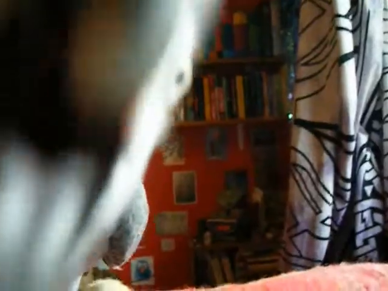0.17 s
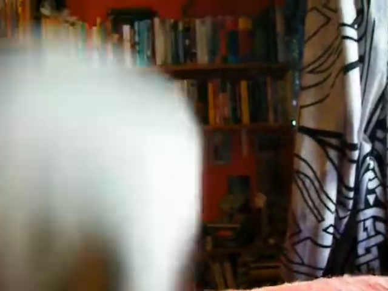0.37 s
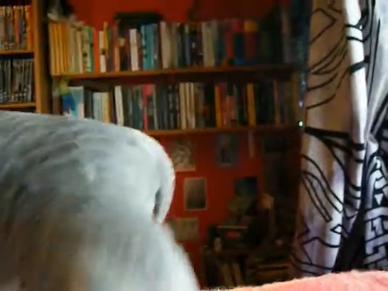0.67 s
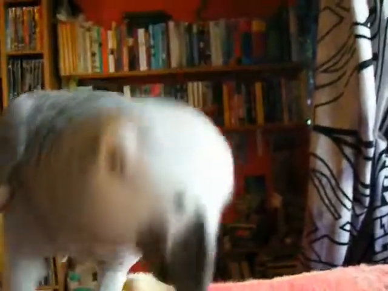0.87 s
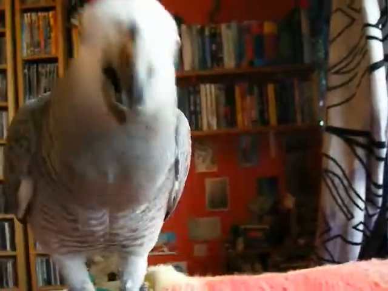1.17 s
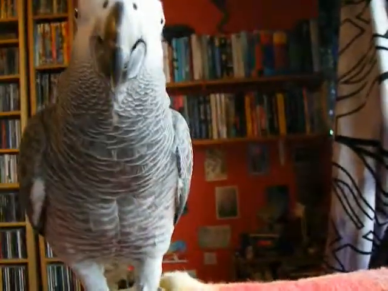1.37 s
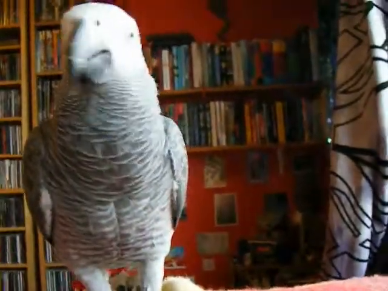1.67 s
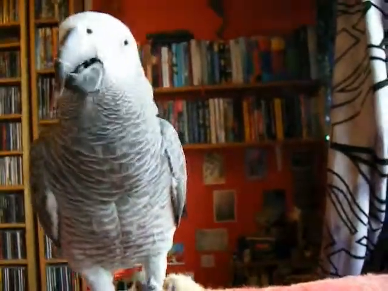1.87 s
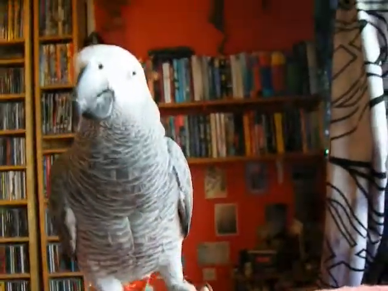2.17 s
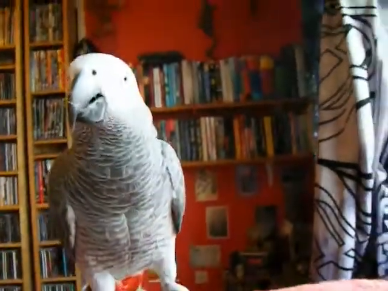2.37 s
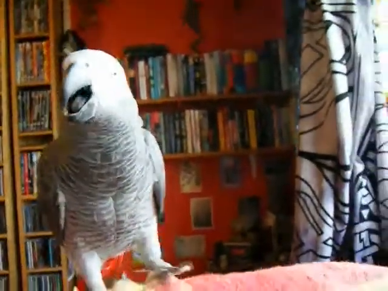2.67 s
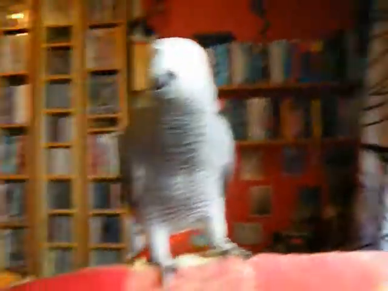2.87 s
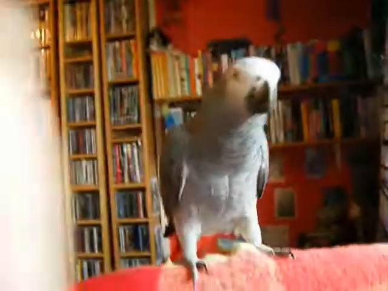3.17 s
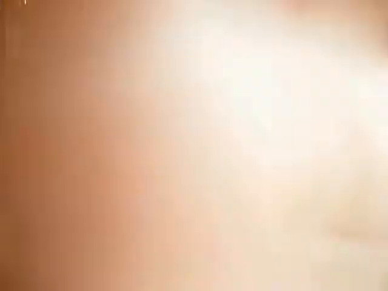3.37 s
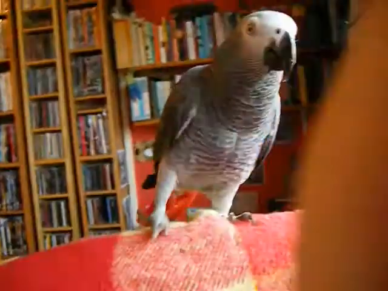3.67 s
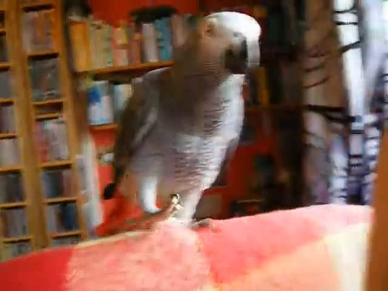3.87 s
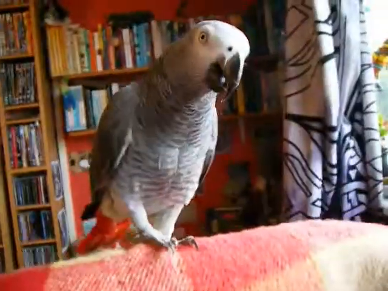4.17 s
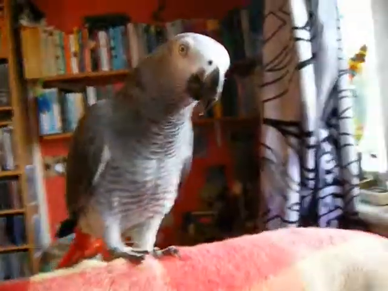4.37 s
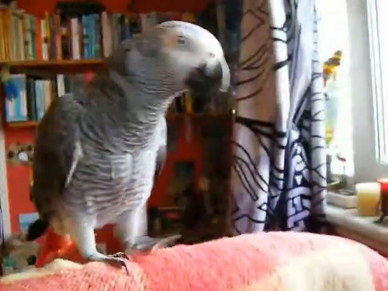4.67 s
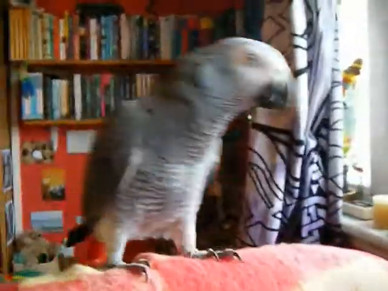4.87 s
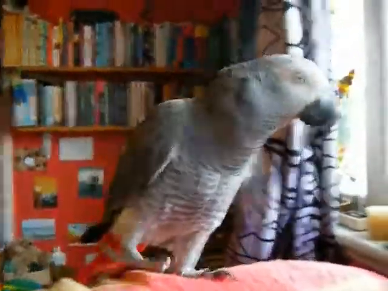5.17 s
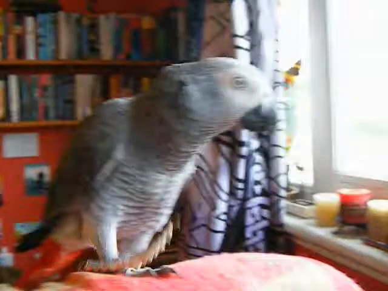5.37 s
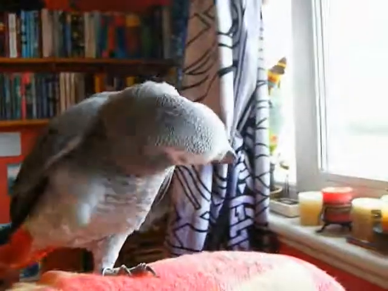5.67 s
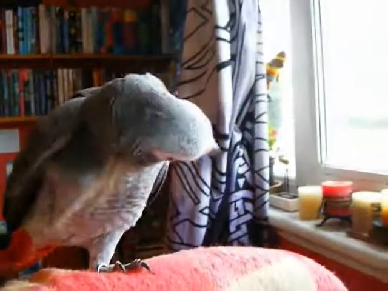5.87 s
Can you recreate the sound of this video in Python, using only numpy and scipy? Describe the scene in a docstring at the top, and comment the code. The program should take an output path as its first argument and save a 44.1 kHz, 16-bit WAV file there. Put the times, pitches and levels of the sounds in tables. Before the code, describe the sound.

Fingers brush and tick on a small camera over room hum, with a sharp beak-like click and a hard knock, all narrow-sounding.

```python
"""Room air, mains hum and a thin fan whine in a living room, heard through a small hand-held camera.
Feathers and fingers brush its plastic case in swarms of tiny slips; light touches ring it.
A sharp, loud click, perhaps a grey parrot's beak, rises in pitch and chatters away.
The grip creaks; fingers tick and knock on the case as the camera turns.
The sound is narrow, like a telephone's; the sharp click and the last knock overload it."""
import sys
import numpy as np
from scipy import signal
from scipy.fft import rfft, irfft
from scipy.io import wavfile

SR = 44100
rng = np.random.default_rng(int(sys.argv[2]) if len(sys.argv) > 2 else 0)


def store_pcm(level_fs):
    """Save levels as 16-bit WAV."""
    pcm = np.round(np.clip(level_fs, -1, 1) * 32767).astype(np.int16)
    wavfile.write(sys.argv[1], SR, np.atleast_2d(pcm).T)


N = 265834
TIME_S = np.arange(N) / SR
HIT_TIME_S = TIME_S[:SR // 5]

# Room air facing the shelves, and facing the window. Each row: frequency in Hz, relative density in dB.
SHELVES_SPECTRUM = [(40, -15.5), (100, -13), (200, -14), (310, 1), (450, -4.5), (750, -4), (1050, -4),
                    (1400, -8.5), (1900, -13.5), (2400, -10), (3000, -12.5), (3600, -18)]
WINDOW_SPECTRUM = [(40, -21), (100, -12), (200, -8), (330, -4), (500, -0.5), (720, 2.5), (1000, -3.5),
                   (1500, -5), (2050, -3.5), (2350, -10), (3000, -9.5), (3600, -13.5)]
# Air as the camera turns. Each row: time in seconds, level in dB, window share of the power from 0 to 1.
AIR_TURN = [(0, -40.5, 0.16), (3.4, -40, 0.47), (4.2, -36, 0.39), (5.0, -40, .5), (6.03, -40, .85)]
# Hum overtones. Each row: multiple of the hum frequency, relative level in dB.
HUM_OVERTONES = [(3, 0), (5, -6)]
# Fan tones. Each row: frequency in Hz, relative level in dB.
WHINE_TONES = [(167, -20), (778.2, -1), (1039, -14), (2336, -17)]
# Level curves of the hum, its overtones and the whine. Each row: time in seconds, level in dB.
HUM_LEVELS = [(0.15, -70), (2.68, -52.5), (4.46, -49), (5.9, -52.5)]
OVERTONE_LEVELS = [(0, -66), (3.0, -65.5), (3.7, -50.5), (5.1, -49), (6.03, -54.5)]
WHINE_LEVELS = [(0, -46.5), (1.5, -42.5), (2.5, -45.5), (4.2, -44.5), (4.75, -42.5), (6.03, -46.5)]
# Brush strokes. Each row: middle in seconds, half length in seconds, level in dB, band centre in Hz.
BRUSH_STROKES = [ (0.474, 0.035, -34.5, 700), (1.306, 0.019, -41.5, 443), (2.164, 0.026, -39, 307),
                 (2.588, 0.0095, -34.5, 1100), (2.671, 0.045, -39.5, 1070), (2.773, 0.079, -33, 1260),
                 (2.953, 0.057, -34.5, 1600), (3.047, 0.03, -38.5, 1820), (3.177, 0.062, -38.5, 1950),
                 (3.328, 0.01, -38.5, 2080), (3.724, 0.032, -34, 1640), (3.88, 0.14, -41, 1900),
                 (4.003, 0.025, -38.5, 2000), (4.342, 0.026, -31, 1850), (4.437, 0.025, -34.5, 2600),
                 (4.545, 0.0095, -37, 2300), (5.795, 0.012, -40, 2370), ]
# Light touches. Each row: start in seconds, spot level in dB, spot pitch in Hz, spot T60 in seconds,
# case level in dB.
LIGHT_TOUCHES = [ (1.2984, -17, 620, 0.0041, -25.5), (1.3650, -12, 3390, 0.011, -50),
                 (1.3784, -25.5, 2050, .012, -50), (1.916, -19, 3040, 0.0057, -18),
                 (1.9619, -17, 2400, .01, -32), (2.1771, -25.5, 372, 0.0081, -30),
                 (2.5588, -23.5, 1450, .008, -25), (2.5758, -7.5, 1000, 0.0059, -8.5),
                 (2.6540, -15, 1630, 0.0061, -15.5), (2.7798, -26, 3200, 0.007, -18.5),
                 (2.8523, -12.5, 940, .003, -23.5), (2.9067, -13, 2420, 0.0058, -42),
                 (2.9678, -13, 760, 0.013, -30), (4.034, -20, 920, 0.012, -36),
                 (4.0483, -24.5, 3350, .006, -23), (4.0562, -21, 890, 0.017, -26),
                 (4.1056, -22, 900, .016, -28), (4.1703, -18.5, 700, .0075, -34),
                 (4.1810, -20.5, 882, 0.016, -37.5), (4.2277, -13.5, 646, 0.0047, -23),
                 (4.3087, -11, 2310, 0.0055, -14), (4.4009, -21.5, 1680, 0.0053, -28),
                 (4.6680, -27.5, 3100, .007, -31), (4.7114, -17, 780, 0.0041, -32.5),
                 (4.7890, -24, 2500, .005, -29.5), (4.8225, -28, 2500, 0.007, -24.5),
                 (5.3132, -13, 2810, 0.0048, -15.5), (5.3134, -15, 1950, 0.013, -37), ]
# Modes of the case and of one panel. Each row: frequency in Hz, relative level in dB, T60 in seconds.
CASE_MODES = [(366, -8.5, 0.017), (895, 6, 0.0035), (1012, -26, 0.0054), (1620, -17, 0.0017),
              (2063, -4.5, 0.0095), (2775, -13, 0.011), (3320, -14, 0.013)]
PANEL_MODES = [(903, -5.5, .012), (1079, -9, 0.043), (1215, -7, 0.063), (3278, -8, .014)]
# Finger knocks on the panel. Each row: start in seconds, level in dB.
PANEL_KNOCKS = [(4.1599, -18), (4.5980, -0.5)]


def from_db(db):
    """Decibels to gain."""
    return 10 ** (np.asarray(db) / 20)


def unit_rms(x):
    """Scale to rms 1."""
    return x / np.sqrt(np.mean(x ** 2) + 1e-20)


def curves(rows):
    """Interpolate timed rows to one per-sample curve per value column."""
    times_s, *columns = np.transpose(rows)
    return [np.interp(TIME_S, times_s, column) for column in columns]


def add(out, start_s, sound):
    """Mix a sound in at start_s."""
    at = max(round(start_s * SR), 0)
    out[at:at + len(sound)] += sound[:N - at]


def coloured_noise(spectrum):
    """Steady noise with the given spectrum, rms 1."""
    hz, db = np.transpose(spectrum)
    bins_hz = np.maximum(np.arange(N // 2 + 1) * SR / N, 1)
    gains = from_db(np.interp(np.log(bins_hz), np.log(hz), db))
    return unit_rms(irfft(rfft(rng.standard_normal(N)) * gains, N))


def room_air():
    """Air noise changes colour as the camera turns from shelves to window."""
    level_db, share = curves(AIR_TURN)
    shelves = np.sqrt(1 - share) * coloured_noise(SHELVES_SPECTRUM)
    window = np.sqrt(share) * coloured_noise(WINDOW_SPECTRUM)
    return from_db(level_db) * (shelves + window)


def drift(knots_per_s):
    """Slow random curve through unit normal knots."""
    knots = rng.standard_normal(N // 100)
    return np.interp(TIME_S * knots_per_s, np.arange(len(knots)), knots)


def tone(hz, waver_hz, flutter_db=1.2):
    """Slightly unsteady sine, rms about 1."""
    phase = 2 * np.pi * np.cumsum(hz + waver_hz * drift(4.5)) / SR
    return np.sqrt(2) * np.sin(phase) * from_db(flutter_db * drift(7))


def mains_hum(hz=120.15):
    """Hum and overtones swell and fade as the camera moves through their standing waves."""
    hum_db, = curves(HUM_LEVELS)
    overtones_db, = curves(OVERTONE_LEVELS)
    hum = tone(hz, waver_hz=0.1, flutter_db=0.3)
    overtones = sum(from_db(db) * tone(k * hz, waver_hz=0.6) for k, db in HUM_OVERTONES)
    return from_db(hum_db) * hum + from_db(overtones_db) * overtones


def fan_whine():
    """Thin wavering tones, as of a small fan."""
    level_db, = curves(WHINE_LEVELS)
    return from_db(level_db) * sum(from_db(db) * tone(hz, waver_hz=1.0) for hz, db in WHINE_TONES)


def brushing(slips_per_s=1500, size_db=3.0, hiss_db=-4, port_hz=2080, port_width_hz=400, port_gain=0.62):
    """Friction: tiny slips on a smooth hiss, coloured by the hollow of the microphone port."""
    sizes = from_db(size_db * np.minimum(rng.exponential(1, N), 4))
    signs = rng.choice([-1, 1], N)
    slips = unit_rms(sizes * signs * (rng.random(N) < slips_per_s / SR))
    friction = slips + from_db(hiss_db) * rng.standard_normal(N)
    port = signal.iirpeak(port_hz, port_hz / port_width_hz, fs=SR)
    friction += port_gain * signal.lfilter(*port, friction)
    out = np.zeros(N)
    for middle_s, half_s, db, hz in BRUSH_STROKES:
        width_octaves = max(1.46 + 0.14 * (db + 34.5), 0.5)  # firmer stroke, wider band
        edge_ratio = 2 ** (width_octaves / 2)
        edges_hz = np.clip([hz / edge_ratio, hz * edge_ratio], 20, SR / 4)
        band = signal.sosfilt(signal.butter(2, edges_hz, "band", fs=SR, output="sos"), friction)
        envelope = np.exp(-0.75 * ((TIME_S - middle_s) / half_s) ** 2)
        out += from_db(db) * envelope * unit_rms(band)
    return out


def decay(t60_s, hold_s=0):
    """Envelope: holds, then falls 60 dB per t60_s."""
    return from_db(-60 * np.maximum(HIT_TIME_S - hold_s, 0) / t60_s)


def mode(hz, t60_s):
    """Struck mode: a decaying sine."""
    return np.sin(2 * np.pi * hz * HIT_TIME_S) * decay(t60_s)


def ping(db, hz, t60_s=0.008, swell_cycles=0.15):
    """One short ring that swells within its first cycle."""
    sound = mode(hz, t60_s) * (1 - np.exp(-HIT_TIME_S * hz / swell_cycles))
    return from_db(db) * sound / np.abs(sound).max()


def clack(db, spread_db=1.5):
    """A plastic-sounding clack: short modes with new strengths each time."""
    offsets_db = spread_db * rng.standard_normal(len(CASE_MODES))
    return sum((-1) ** k * from_db(db + mode_db + offsets_db[k]) * mode(hz, t60_s)
               for k, (hz, mode_db, t60_s) in enumerate(CASE_MODES))


def with_tail(click, tail_db=-14, t60_s=0.092, build_s=0.003):
    """A click plus its diffuse after-ring."""
    envelope = decay(t60_s) * (1 - np.exp(-HIT_TIME_S / build_s))
    scatter = rng.standard_normal(len(click)) * envelope
    tail = signal.fftconvolve(click, scatter / np.linalg.norm(scatter))[:len(click)]
    return click + from_db(tail_db) * tail


def light_touches():
    """Each light touch rings one spot and the whole case."""
    out = np.zeros(N)
    for start_s, spot_db, hz, t60_s, case_db in LIGHT_TOUCHES:
        add(out, start_s, with_tail(ping(spot_db, hz, t60_s) + clack(case_db)))
    return out


def sharp_click(start_s=1.9635, click_db=-0.5, clack_offset_db=-18.5, tail_db=-11,
                from_hz=1974, to_hz=3412, rise_s=0.0028, swell_s=0.00076,
                chatter_db=-7.5, loss_db=3, gap_s=0.0024):
    """A loud click, perhaps the parrot's beak, rises quickly in pitch, then chatters in weaker clicks."""
    out = np.zeros(N)
    pitch_hz = np.interp(HIT_TIME_S, [rise_s / 2, rise_s], [from_hz, to_hz])
    envelope = (1 - np.exp(-HIT_TIME_S / swell_s)) * decay(t60_s=0.0087, hold_s=rise_s)
    chirp = from_db(click_db) * envelope * np.sin(2 * np.pi * np.cumsum(pitch_hz) / SR)
    add(out, start_s, with_tail(chirp + clack(click_db + clack_offset_db), tail_db))
    for k, hz in enumerate((3030, 1960, 2900, 3030)):
        db = chatter_db - k * loss_db
        chatter = ping(db, hz) + clack(db + clack_offset_db)
        add(out, start_s + rise_s + (k + 1) * gap_s, with_tail(chatter, tail_db))
    return out


def grip_slip(start_s=2.8594, gap_s=0.003, first_db=-14, rise_db=1.77, case_offset_db=-3.5):
    """A finger sticks and slips in a short creak, each catch harder than the last."""
    out = np.zeros(N)
    for k, spot_hz in enumerate((3290, 1500, 800, 3290, 1500)):
        db = first_db + k * rise_db
        catch = ping(db, spot_hz) + clack(db + case_offset_db)
        add(out, start_s + k * gap_s, with_tail(catch, tail_db=-13))
    return out


def finger_fidgets(start_s=4.0, span_s=0.6, count=7, centre_hz=706, spread_octaves=0.8):
    """Fingers turning the camera tick faintly at random moments and pitches."""
    out = np.zeros(N)
    for when, pitch in rng.random((count, 2)):
        hz = centre_hz * 2 ** (spread_octaves * (2 * pitch - 1))
        tick = ping(db=-30, hz=hz) + clack(db=-30.5)
        add(out, start_s + when * span_s, with_tail(tick))
    return out


def finger_knocks(thud_offset_db=-13, case_offset_db=-10, rebound_s=0.0083, rebound_db=-20):
    """A finger thuds on a panel, rings it with the case and rebounds once."""
    out = np.zeros(N)
    for start_s, db in PANEL_KNOCKS:
        panel = sum((-1) ** k * ping(db + mode_db, hz, t60_s)
                    for k, (hz, mode_db, t60_s) in enumerate(PANEL_MODES))
        thud = ping(db + thud_offset_db, hz=370, t60_s=0.021)
        knock = clack(db + case_offset_db) - panel - thud
        add(out, start_s, with_tail(knock, tail_db=-10))
        add(out, start_s + rebound_s, from_db(rebound_db) * knock)
    return out


def scene(low_cut_hz=170):
    """All sources at one microphone; the clicks and knocks have little bass."""
    room = room_air() + mains_hum() + fan_whine()
    strokes = brushing()
    clicks = light_touches() + sharp_click() + finger_knocks() + grip_slip() + finger_fidgets()
    low_cut = signal.butter(1, low_cut_hz, "high", fs=SR, output="sos")
    return (room + strokes + signal.sosfilt(low_cut, clicks))[None]


def record(dry, band_hz=3688, clip_level=0.71, stop_hz=16855, dc_offset=-0.015):
    """Telephone band; the loudest peaks clip and spit treble; the converter rests just below zero."""
    narrow = signal.sosfiltfilt(signal.butter(30, band_hz, fs=SR, output="sos"), dry)
    clipped = np.clip(narrow, -clip_level, clip_level)
    high_cut = signal.cheby2(20, 60, stop_hz, fs=SR, output="sos")
    return dc_offset + signal.sosfilt(high_cut, clipped)


dry = scene()
out = record(dry)
store_pcm(out)
```